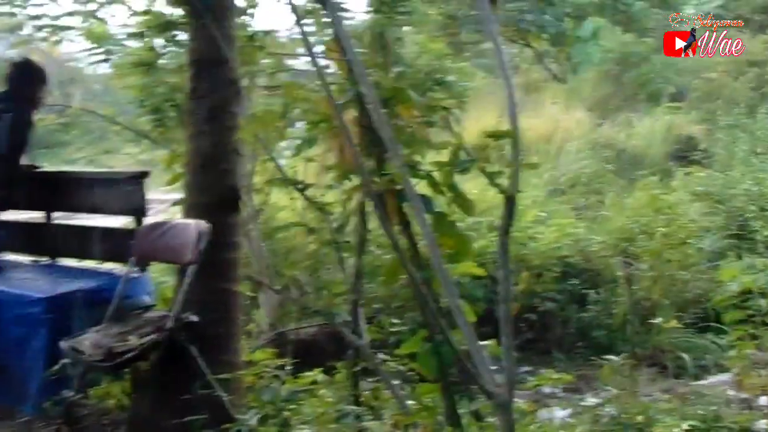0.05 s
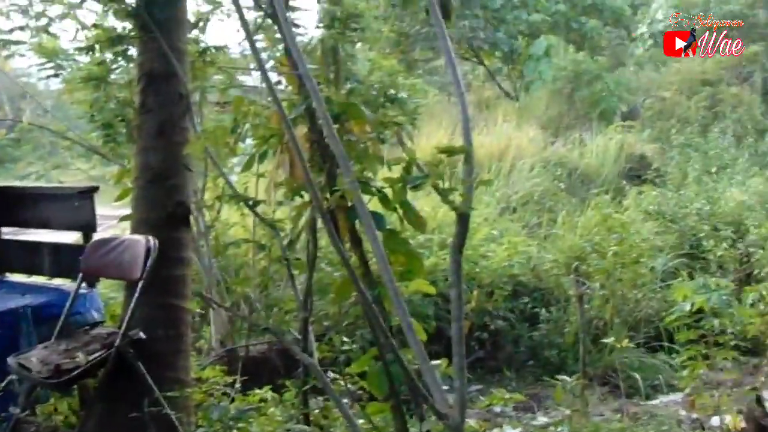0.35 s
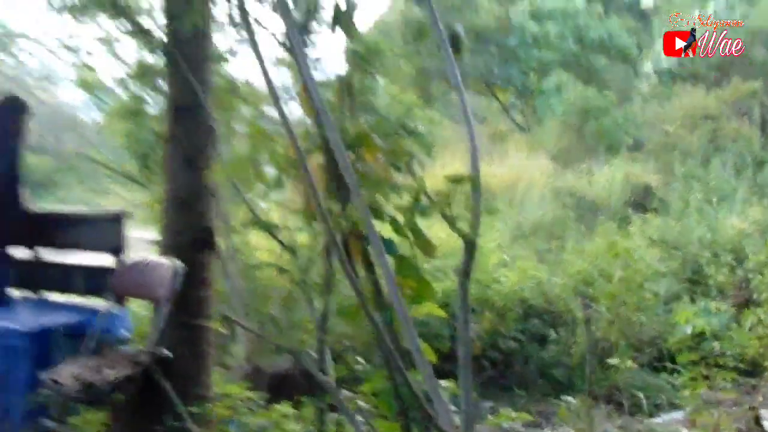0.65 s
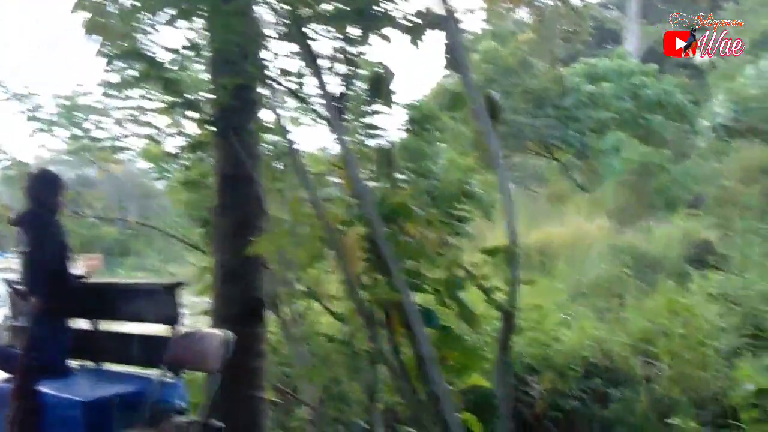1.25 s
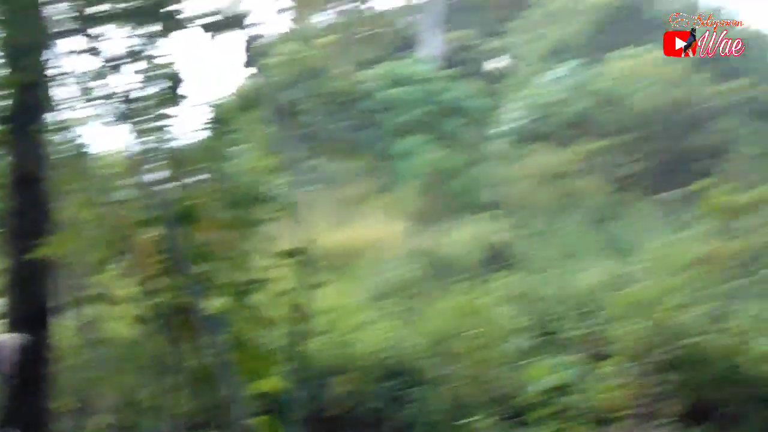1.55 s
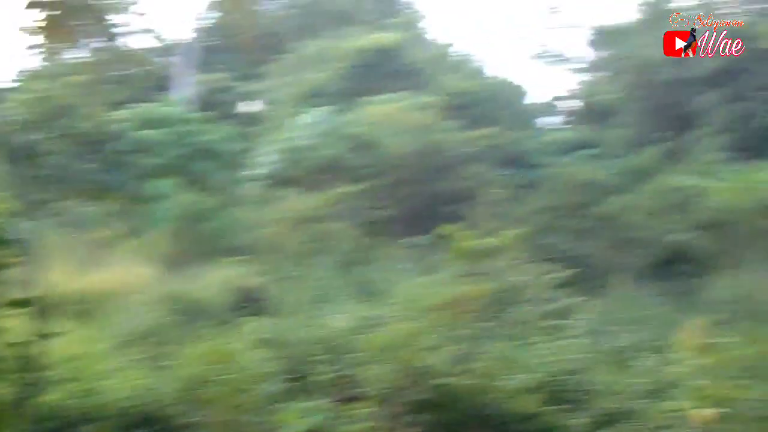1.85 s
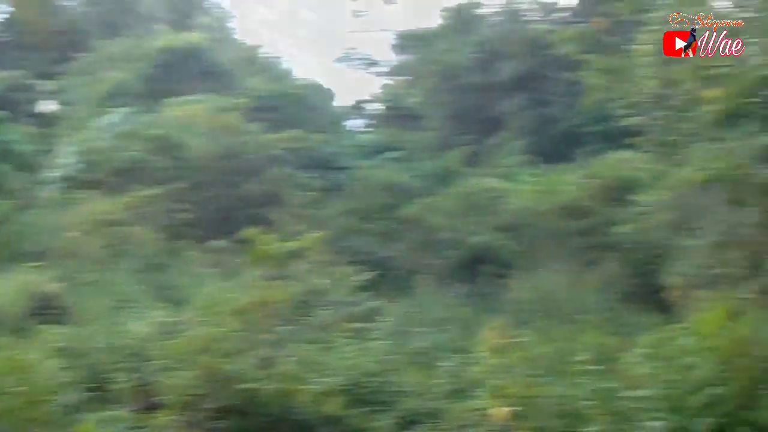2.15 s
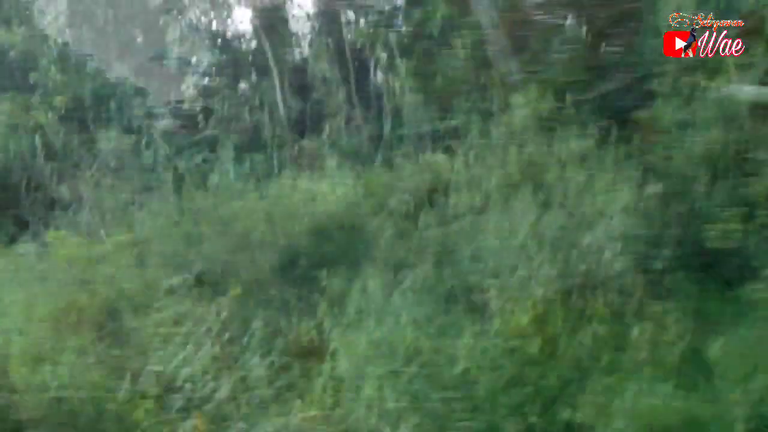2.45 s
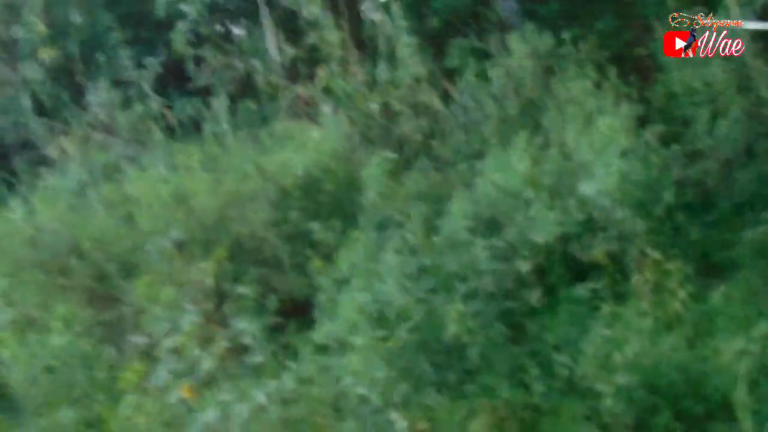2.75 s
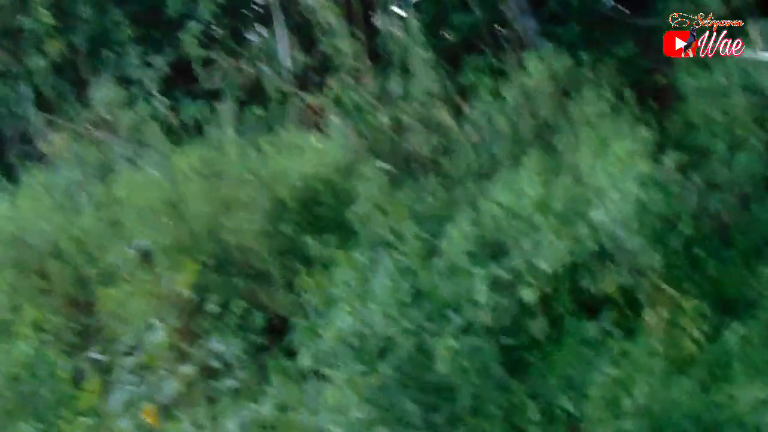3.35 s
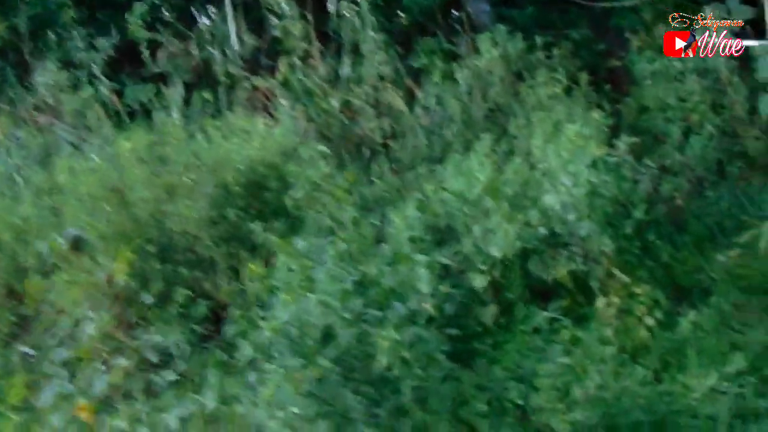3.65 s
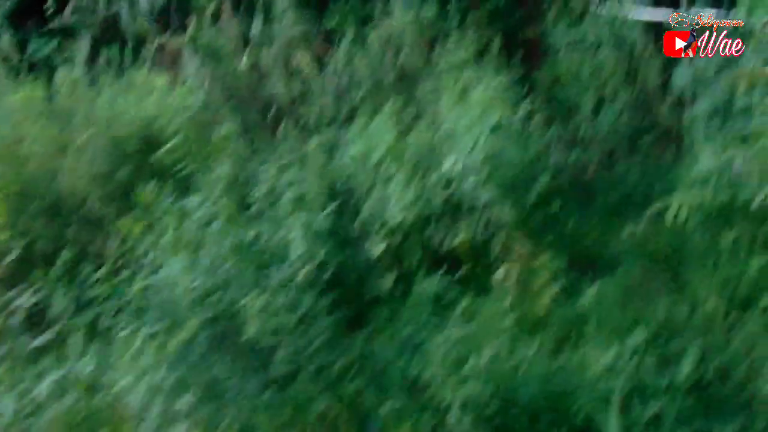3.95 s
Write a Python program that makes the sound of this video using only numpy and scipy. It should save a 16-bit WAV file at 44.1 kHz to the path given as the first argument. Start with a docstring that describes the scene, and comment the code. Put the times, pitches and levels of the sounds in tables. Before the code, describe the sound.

A bird repeats a short, reedy whoop about twice a second among trees and bushes. Insects buzz over a soft outdoor hiss and leaves rustle faintly. Near the end, something hard snaps close to the microphone.

```python
"""Among bushes and trees, a bird repeats a short whoop: a low note that flips up to a reedy top note,
usually louder. A two-voiced note sounds twice, once just before a whoop and once over the last.
Trunks and foliage reflect each call. Insects buzz over a broadband outdoor hiss, leaves rustle, twigs
tick and a small bird chips far off. Late on, something hard snaps close by: three quick cracks and
a short echo, each with a brief metallic ring."""
import sys
import numpy as np
from scipy import signal
from scipy.fft import rfft, irfft, next_fast_len
from scipy.io import wavfile
from scipy.ndimage import map_coordinates

SR = 44100
rng = np.random.default_rng(int(sys.argv[2]) if len(sys.argv) > 2 else 0)


def bounce(signal):
    """Save signal as a 16-bit WAV file at the path given by the first command-line argument."""
    frames = np.transpose(np.atleast_2d(signal))
    limited = np.clip(frames, -1, 1)
    pcm = np.round(limited * 32767).astype(np.int16)
    wavfile.write(sys.argv[1], SR, pcm)


N = 176400
T = np.arange(N) / SR

# The whoops. Each row: onset of the top note in seconds, lengths of the low and top notes in seconds,
# top pitch in Hz, levels of the low and top notes in dB, overtone level relative to the note in dB.
CALLS = [(.016, .05, 0.04, 1117, -45, -22, -12), (.438, .055, .035, 1117, -35.5, -22, -15.5),
         (0.869, 0.053, 0.036, 1114, -33, -23.5, -11.5), (1.475, 0.055, 0.036, 1115, -29.5, -23, -12.5),
         (1.89, 0.047, 0.035, 1113, -40.5, -22.5, -13), (2.294, 0.064, 0.036, 1114, -48, -26, -18.5),
         (2.697, 0.032, .045, 1114, -45, -28, -18.5), (3.263, 0.049, 0.0222, 1231, -30.5, -17, -13),
         (3.706, 0.053, 0.011, 1184, -18.5, -20.5, -9)]
# The reedy timbre. Each row: harmonic number, relative level in dB.
HARMONICS = [(2, -17), (3, -1), (4, -20), (5, -11)]

ATTACK_S, RELEASE_S = 0.0035, 0.0099
JITTER, REED_ROUGHNESS = 0.0057, 0.58  # fractional wander of pitch and of overtone amplitude
RASP_DB, RASP_HZ = -20.5, 1097  # fast flutter of the voice spreads sidebands around each partial
CALL_REVERB_DB = -8.5


def amp(db):
    """Amplitude ratio for a level in decibels."""
    return 10 ** (np.asarray(db) / 20)


def unit(x):
    """Normalisation to rms 1."""
    return x / np.sqrt(np.mean(x ** 2) + 1e-20)


def along(points, hz):
    """Interpolation of (Hz, value) points on a logarithmic frequency axis."""
    freqs, values = np.transpose(points)
    return np.interp(np.log(hz + 1), np.log(freqs + 1), values)


def level(rows):
    """Amplitude envelope through (seconds, dB) points."""
    return amp(np.interp(T, *np.transpose(rows)))


def wobble(rate):
    """Smooth random modulation with rate knots a second."""
    return map_coordinates(rng.standard_normal(int(N * rate / SR) + 4), [T * rate])


def step(u):
    """Logistic transition from 0 to 1 around u = 0."""
    return .5 + .5 * np.tanh(u / 2)


def gate(t, length):
    """Trapezoidal envelope: attack, hold and release."""
    return np.clip(t / ATTACK_S, 0, 1) * np.clip(1 - (t - length) / RELEASE_S, 0, 1)


def decay(start, t60):
    """Exponential damping: a sudden onset, then 60 dB of decay in t60 seconds."""
    return (T >= start) * np.exp(-np.log(1000) * np.maximum(T - start, 0) / t60)


def phase_of(hz):
    """Phase in radians, the time integral of frequency."""
    return 2 * np.pi * np.cumsum(hz) / SR


def filtered(x, response):
    """Linear filtering: the spectrum is multiplied by a frequency response."""
    size = next_fast_len(N + SR // 2)
    return irfft(rfft(x, size) * response(np.fft.rfftfreq(size, 1 / SR)), size)[:N]


def noise(spectrum):
    """Noise of rms 1, coloured by (Hz, dB) points."""
    return unit(filtered(rng.standard_normal(N), lambda hz: amp(along(spectrum, hz))))


def band(centre_hz, spread):
    """Band-pass noise of rms 1, bell-shaped in log frequency."""
    white = rng.standard_normal(N)
    return unit(filtered(white, lambda hz: np.exp(-.5 * (np.log((hz + 1) / centre_hz) / spread) ** 2)))


def trees(x):
    """Scattering by foliage gives a diffuse tail that lasts longest at middle frequencies."""
    # Reverberation of the trees. Each row: frequency in Hz, time to decay by 60 dB in seconds.
    decay_times = [(300, 0.17), (1100, 0.37), (3400, 0.45), (6000, 0.27), (13000, 0.13)]
    hz, t, spectra = signal.stft(rng.standard_normal(SR // 2), SR, nperseg=256)
    damping = np.exp(-np.log(1000) * t / along(decay_times, hz)[:, None])
    tail = signal.istft(spectra * damping, SR, nperseg=256)[1]
    tail = np.pad(tail / np.linalg.norm(tail), (int(.01 * SR), 0))  # arrives 10 ms late
    return signal.oaconvolve(x, tail)[:N]


def trunks(x):
    """Early reflection: nearby trunks return delayed, weaker copies."""
    # Each row: delay in seconds, gain in dB.
    reflections = [(0.016, -12), (0.033, -15.5), (0.057, -26)]
    return sum(amp(db) * np.interp(T - delay, T, x, left=0) for delay, db in reflections)


def air():
    """Ambient broadband noise: distant rumble and hiss, drifting in level."""
    # Background spectrum. Each row: frequency in Hz, relative level in dB.
    spectrum = [(20, -3.5), (45, 1), (78, 1), (140, -2.5), (185, -6), (270, -4.5), (400, -7), (600, -7.5),
                (1000, -8), (2000, -12), (3500, -15), (5500, -17.5), (11000, -20.5), (14000, -15.5)]
    # Slow drift. Each row: time in seconds, level in dB.
    drift = [(0, -35.5), (1.0, -36.5), (1.9, -36.5), (2.5, -39.5), (3.0, -40.5), (3.5, -38.5), (3.75, -37),
             (4, -39.5)]
    return level(drift) * amp(0.29 * wobble(12)) * noise(spectrum)


def insects():
    """Amplitude modulation at an unsteady rate makes a high chorus of noise buzz."""
    # Chorus spectrum. Each row: frequency in Hz, relative level in dB.
    spectrum = [(5800, -39), (6300, -16), (6600, -3), (6900, -0.5), (7060, -4), (7280, 0.5), (7650, -4),
                (8050, -15), (8600, -17), (9300, -11), (10300, -20), (12600, -26.5), (13300, -4.5),
                (13750, -10.5), (14150, -5.5)]
    # Swell of the chorus. Each row: time in seconds, relative level in dB.
    swell = [(0.0, -38.5), (1.58, -38), (1.93, -38), (2.49, -41.5), (2.81, -43.5), (3.49, -38.5),
             (3.72, -36.5), (4.0, -39)]
    buzz_hz, depth = 80.2, 0.14
    buzz = 1 + depth * np.sin(phase_of(buzz_hz * (1 + 0.033 * wobble(8.6))))
    return amp(5.5 + 0.17 * wobble(22)) * level(swell) * unit(buzz * noise(spectrum))


def undergrowth():
    """Leaves rustle as randomly modulated noise; twigs tick as damped noise bursts."""
    # Leaf movements. Each row: midpoint in seconds, half length in seconds, level in dB.
    rustles = [(0.287, .06, -44), (0.479, .04, -42.5), (0.685, 0.053, -41.5), (1.307, .022, -40),
               (1.544, .025, -38.5), (2.794, 0.072, -43.5), (3.132, 0.042, -38), (3.268, 0.048, -40.5),
               (3.882, 0.16, -37)]
    # Leaf spectrum. Each row: frequency in Hz, relative level in dB.
    spectrum = [(300, -9), (2000, -0.5), (5000, -2), (9000, 0.5), (13000, 0), (14500, -6)]
    # Twig ticks. Each row: start in seconds, centre frequency in Hz, level in dB.
    twigs = [(0.678, 585, -29), (1.526, 3010, -31.5), (2.668, 8500, -45), (3.278, 3800, -34),
             (3.952, 5000, -32.5)]
    swish = sum(amp(db) * np.exp(-.5 * ((T - middle) / half) ** 2) for middle, half, db in rustles)
    ticks = sum(amp(db) * decay(start, t60=0.065) * band(hz, spread=0.52) for start, hz, db in twigs)
    grains = unit(noise(spectrum) * amp(1.4 * wobble(400)))
    return swish * grains + ticks


def far_bird():
    """Harsh narrow-band chips; at a distance, reverberation nearly equals the direct sound."""
    # Each row: start in seconds, centre frequency in Hz, relative level in dB.
    chips = [(0.156, 3350, -32.5), (3.017, 3760, -41.5)]
    direct = sum(amp(db) * gate(T - start, 0.013) * band(hz, spread=0.082) for start, hz, db in chips)
    return amp(-2.5) * (direct + amp(-1) * trees(direct))


def snap():
    """Impact excitation: three quick cracks and a short echo, each with a ring of damped modes."""
    # The three cracks, then the echo. Each row: start in seconds, relative level in dB.
    bursts = [(3.1835, -11), (3.188, -8), (3.193, -17), (3.2074, -17.5)]
    # Crack spectrum. Each row: frequency in Hz, relative level in dB.
    spectrum = [(600, -44), (1900, -29), (2330, -8.5), (2700, -8.5), (3400, -6), (4300, -7.5), (5900, -6),
                (7600, -7), (8240, -1.5), (9700, -4), (12500, 0), (14000, -1.5)]
    # Resonances. Each row: frequency in Hz, relative level in dB, time to decay by 60 dB in seconds.
    modes = [(2347, -12, 0.049), (5757, -11.5, 0.062), (8310, -3, 0.04), (9150, -9.5, 0.056),
             (10800, -13, .07), (11293, -15, 0.084), (12550, -8, 0.079)]
    out = np.zeros(N)
    for start, db in bursts:
        ring = sum(amp(mode_db) * decay(start, t60) * np.sin(2 * np.pi * (hz * T + rng.random()))
                   for hz, mode_db, t60 in modes)
        crack = decay(start, t60=0.042) * noise(spectrum)
        out += amp(db) * (crack + amp(-3.5) * ring)
    return out + amp(-22.5) * trees(out)


def throat():
    """A pulse of narrow-band noise adds a faint hollow puff as each call flips up."""
    puffs = sum(np.exp(-.5 * ((T - onset) / 0.011) ** 2) for onset, *_ in CALLS)
    return amp(-43) * puffs * band(centre_hz=521, spread=0.1)


def two_voiced_notes():
    """Biphonation: one voice holds its pitch while a lower one curls upward."""
    # Each row: start and length in seconds, steady voice's pitch in Hz and level in dB,
    # rising voice's first and last pitch in Hz and level in dB.
    notes = [(3.118, .062, 1103, -35, 783, 970, -32), (3.725, 0.027, 1120, -18, 850, 943, -30)]
    swell_db, peak_at = 7, 0.6  # loudest at this fraction of the length
    out = np.zeros(N)
    for start, length, steady_hz, steady_db, first_hz, last_hz, rising_db in notes:
        progress = np.clip((T - start) / length, 0, 1)
        rising_hz = (first_hz + (last_hz - first_hz) * progress ** 3) * (1 + 0.0204 * wobble(200))
        rising = amp(rising_db) * np.sin(phase_of(rising_hz))
        phase = phase_of(steady_hz * (1 + JITTER * wobble(150)))
        reed = (1 + REED_ROUGHNESS * wobble(350)) * sum(amp(db) * np.sin(k * phase) for k, db in HARMONICS)
        steady = amp(steady_db) * (np.sin(phase) + amp(-19) * reed)
        rasp = 1 + amp(RASP_DB + 8) * wobble(RASP_HZ)
        swell = amp(-swell_db * ((progress - peak_at) / peak_at) ** 2)
        out += gate(T - start, length) * swell * rasp * (steady + rising)
    return out + trunks(out) + amp(CALL_REVERB_DB) * trees(out)


def whoops():
    """A frequency jump: the low note flips up to a top note that swells and gains rough harmonics."""
    low_hz, sag_hz_per_s, fall_hz_per_s = 775, 230, 8900
    flip_lead_s, flip_s, reed_delay_s, reed_rise_s = .010, 0.0044, 0.011, 0.0072
    firm_db, swell_db = -24, 4.5  # a low note softer than firm_db falters
    waver = 1 + JITTER * wobble(150)
    shimmer_db = wobble(120)
    falter = .33 * np.tanh(wobble(110))
    rasp = 1 + amp(RASP_DB) * wobble(RASP_HZ)
    out = np.zeros(N)
    for onset, lead, hold, top_hz, low_db, top_db, reed_db in CALLS:
        near = abs(T - onset) < .1
        t, tone, reed = T[near] - onset, np.zeros(N), np.zeros(N)
        up = step((t + flip_lead_s) / flip_s)  # 0 on the low note, 1 on the top note
        jump_hz = top_hz - low_hz - sag_hz_per_s * (t - hold / 2)
        fall_hz = fall_hz_per_s * np.clip(t - hold, 0, RELEASE_S)  # pitch collapses in the release
        phase = phase_of((low_hz + jump_hz * up - fall_hz) * waver[near])
        faltering_db = low_db + max(firm_db - low_db, 0) * falter[near]
        swelling_db = top_db + swell_db * (np.clip(t / hold, 0, 1) - 1)
        dip_db = 11 * up * (1 - up)  # the voice thins by nearly 3 dB in mid-flip
        voice_db = faltering_db * (1 - up) + swelling_db * up - dip_db + shimmer_db[near]
        envelope = gate(t + lead, lead + hold) * rasp[near] * amp(voice_db)
        overtones = sum(amp(reed_db + db) * np.sin(k * phase) for k, db in HARMONICS)
        tone[near] = envelope * np.sin(phase)
        reed[near] = envelope * step((t - reed_delay_s) / reed_rise_s) * overtones
        reed *= 1 + REED_ROUGHNESS * wobble(350)
        out += tone + reed + trunks(tone + reed) + trees(amp(CALL_REVERB_DB) * tone + amp(-1.5) * reed)
    return out


def scene():
    """Superposition of all sources, the same in both channels."""
    near_bird = whoops() + throat() + two_voiced_notes()
    mono = near_bird + far_bird() + snap() + undergrowth() + insects() + air()
    return np.array([mono, mono])


def record(dry):
    """Band limiting: an ideal low-pass filter removes the highest treble."""
    cutoff_hz = 14230
    return np.array([filtered(x, lambda hz: hz < cutoff_hz) for x in dry])


dry = scene()
out = record(dry)
bounce(out)
```